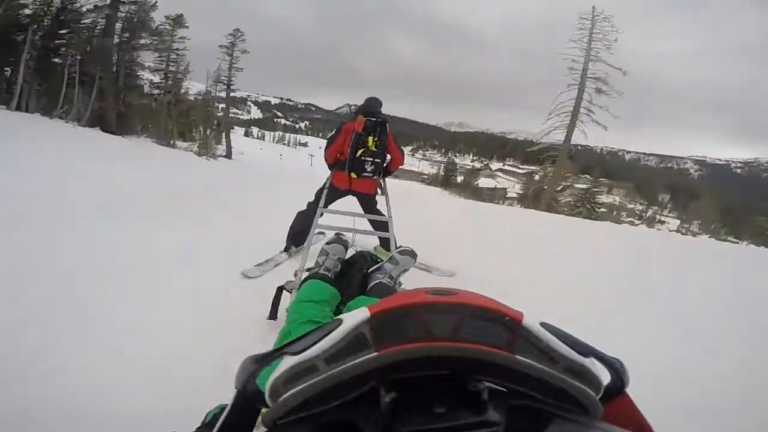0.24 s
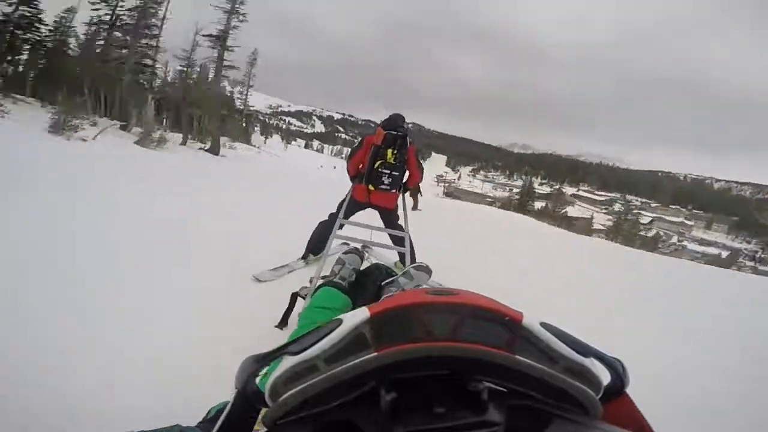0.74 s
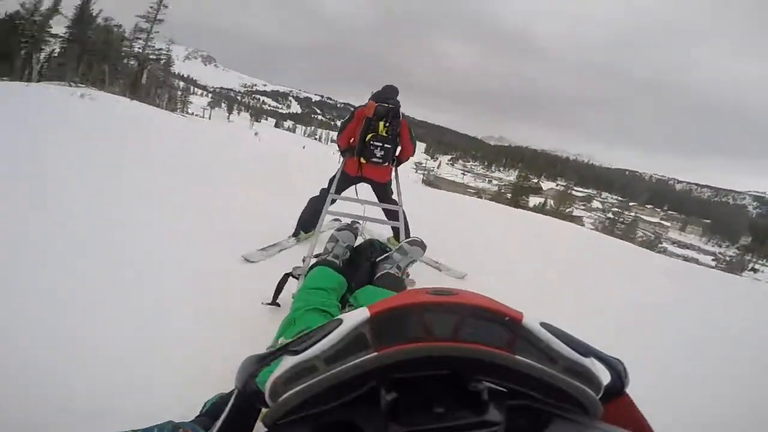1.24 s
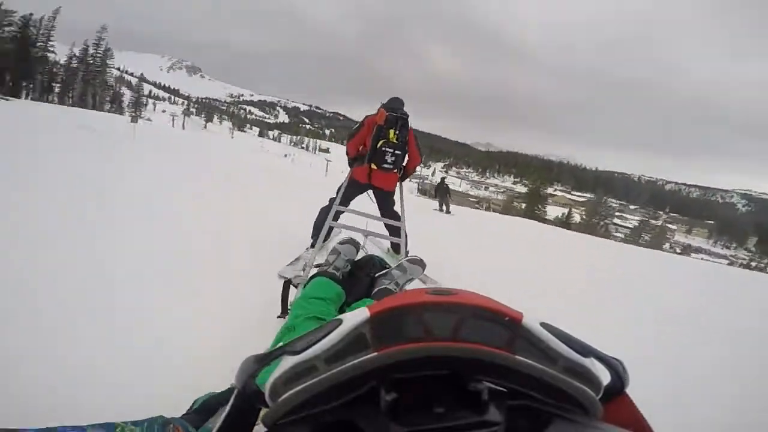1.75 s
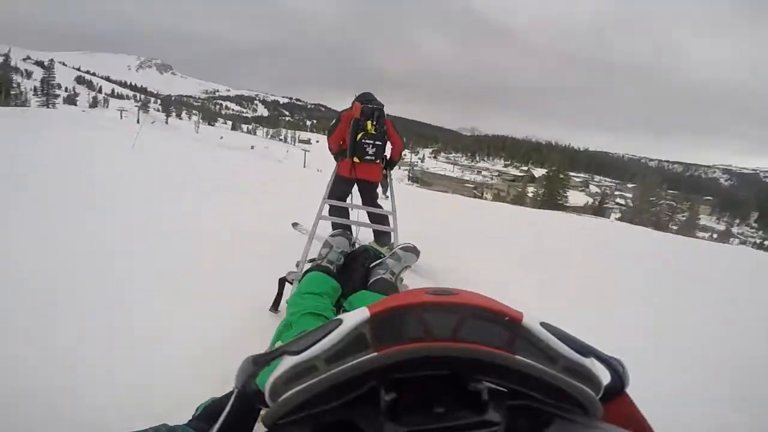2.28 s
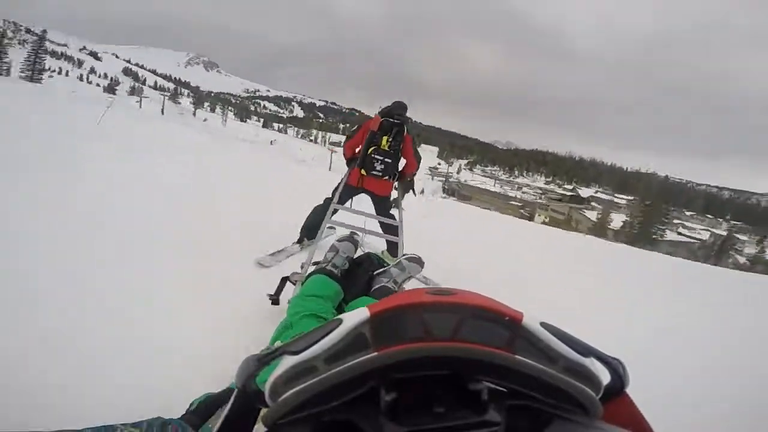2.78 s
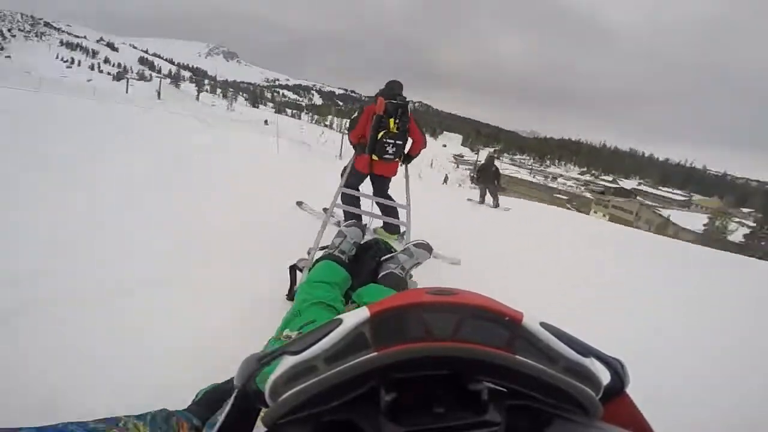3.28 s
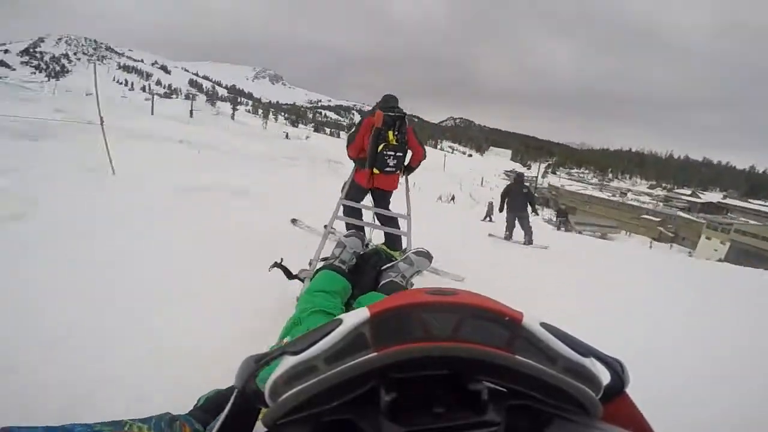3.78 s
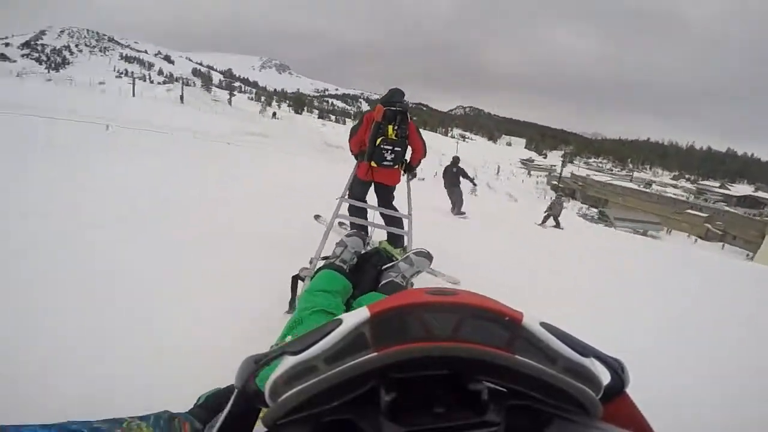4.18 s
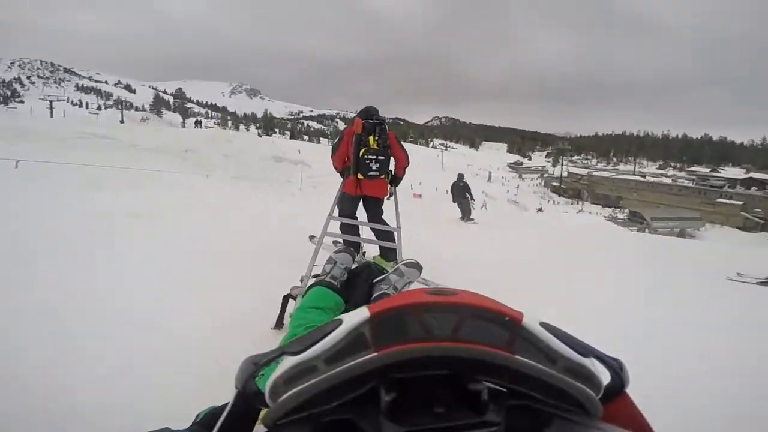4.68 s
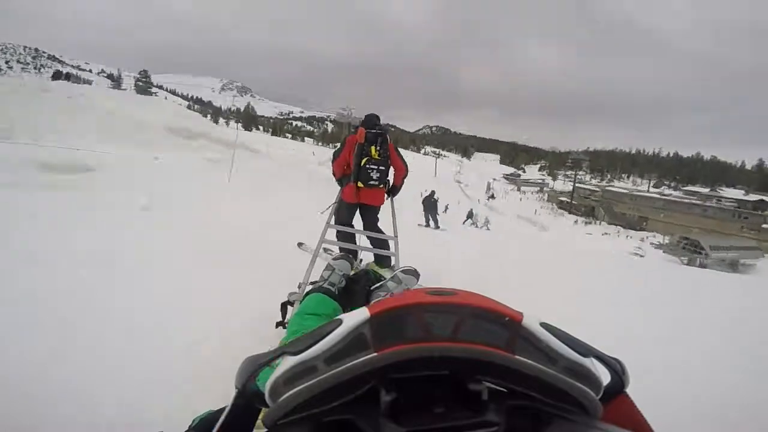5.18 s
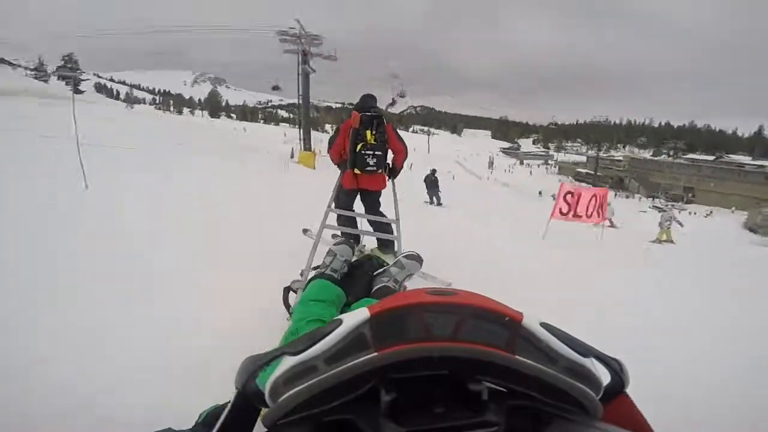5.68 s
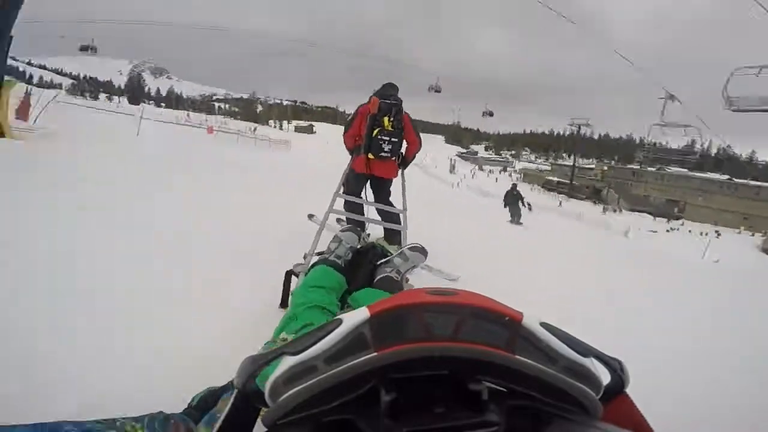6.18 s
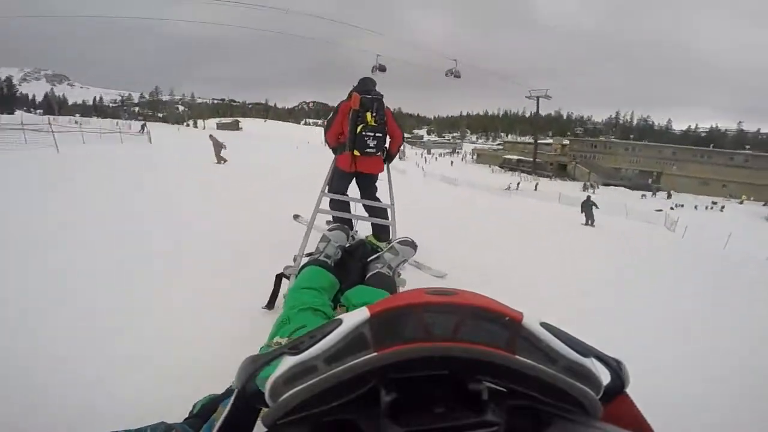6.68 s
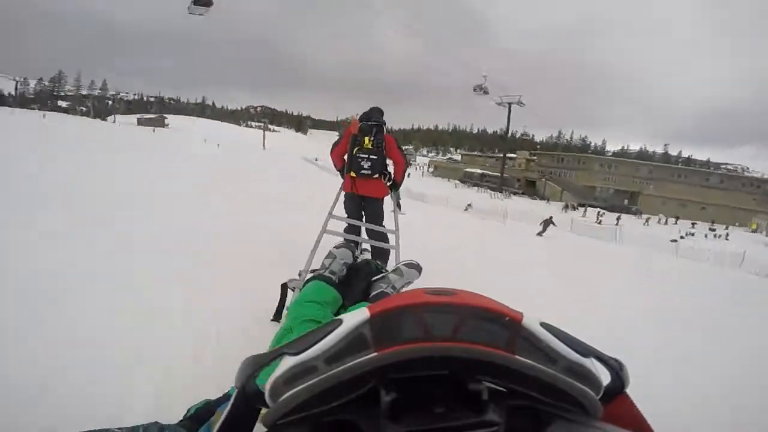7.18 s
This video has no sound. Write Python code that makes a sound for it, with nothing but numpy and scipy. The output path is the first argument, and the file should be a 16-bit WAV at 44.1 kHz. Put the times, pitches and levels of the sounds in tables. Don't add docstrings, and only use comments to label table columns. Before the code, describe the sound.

Hollow hull thumps, gritty snow scraping and crackling crystals from a sled sliding downhill, with one piercing ice crack and rougher bumps late on.

```python
import sys
import numpy as np
from scipy import signal
from scipy.fft import rfft, irfft, next_fast_len
from scipy.io import wavfile
from scipy.ndimage import uniform_filter1d

SR = 44100
rng = np.random.default_rng(int(sys.argv[2]) if len(sys.argv) > 2 else 0)


def voltage_ratio(decibels):
    exponent = np.asarray(decibels, float) / 20
    return 10 ** exponent


def to_wav(sig):
    pcm = np.clip(np.atleast_2d(sig), -1, 1) * 32767
    pcm = np.round(pcm).astype(np.int16)
    wavfile.write(sys.argv[1], SR, pcm.T)


N = 328545

# [f/Hz, width/Hz, level/dB]
HULL_NOTES = [(198.7, 124, -9), (272, 45.4, 0.5), (364, 69, -8)]
# [t/s, peak level/dB, f/Hz]
SLAPS = [(0.115, -12, 260), (0.272, -7, 256), (0.666, -8.5, 270), (0.708, -9, 250), (0.785, -12.5, 288),
         (0.886, -11, 283), (1.162, -10, 266), (1.257, -4.5, 265), (1.413, -5.5, 279), (1.592, -16, 269),
         (2.403, -10, 269), (3.171, -7.5, 256), (3.283, -12.5, 293), (4.051, -11, 264), (5.273, -12, 264),
         (5.381, -3.5, 272), (5.41, -16, 264), (5.659, -7.5, 277), (5.704, -22, 291), (5.882, -6.5, 246),
         (5.963, -5, 261), (6.063, -5.5, 242), (6.108, -10, 318), (6.16, -8, 290), (6.851, -12, 288),
         (6.939, -10.5, 320), (7.011, -15, 280), (7.119, -8.5, 288), (7.165, -7, 335), (7.268, -1, 266)]


def hull(level_db, chatter):
    shake = rng.standard_normal(N) * voltage_ratio(0.42 * chatter + 2.4 * drift(29.0))
    notes = np.zeros(N)
    for k, (hz, width_hz, db) in enumerate(HULL_NOTES):
        sign = (-1) ** k
        notes += sign * voltage_ratio(db) * resonance(shake, hz, width_hz)
    drumming = signal.sosfilt(signal.butter(4, 450, fs=SR, output="sos"), notes)
    out = voltage_ratio(level_db + 0.5) * evened(drumming, span_s=0.06, share=0.75)
    t = np.arange(int(0.022 * SR)) / SR
    rise_s, fade_s = 0.0013, 0.0098
    swell_and_fade = (1 - np.exp(-t / rise_s)) * np.exp(-t / fade_s)
    for s, peak_db, hz in SLAPS:
        slap = swell_and_fade * np.sin(2 * np.pi * hz * t)
        at = round(s * SR)
        out[at:at + len(t)] += voltage_ratio(peak_db + 1) * slap[:N - at]
    return out


# [f/Hz, level/dB per Hz]
BUZZ_TONE = [(250, -19), (430, 1.5), (520, 0), (700, -3), (940, -9.5), (1150, -9), (1600, -29), (2600, -27)]


def buzz(hull_db, spray_db, chatter):
    shake = rng.standard_normal(N) * voltage_ratio(2.0 * chatter + 0.75 * drift(36.0))
    level_db = 0.56 * hull_db + 0.55 * spray_db - 6.0
    return voltage_ratio(level_db) * evened(colour(shake, BUZZ_TONE), span_s=0.17, share=1.0)


# [f/Hz, level/dB per Hz]
SCRAPE_TONE = [(300, -22), (600, -4.5), (1100, 1), (1500, 0), (2150, -3), (2500, -8.5), (3350, -9.5),
               (3600, -16.5), (5000, -18.5), (7000, -34)]


def scrape(level_db, chatter):
    rush = rng.standard_normal(N) * voltage_ratio(0.56 * chatter + 1.83 * drift(64.0))
    crunches_per_s = 1200 * voltage_ratio(1.5 * chatter + 2.5 * drift(35.0))
    crunch = rms_one(grains(crunches_per_s, spread_db=4.0))
    shaved = colour(rush + voltage_ratio(-4) * crunch, SCRAPE_TONE)
    return voltage_ratio(level_db + 1.0) * evened(shaved, span_s=0.073, share=0.8)


# [f/Hz, level/dB per Hz]
GLIDE_TONE = [(1500, -13), (2500, -2), (3350, -3.5), (3650, -9), (5150, -4.5), (5450, -2), (6600, 7.5),
              (7700, 0), (9000, 6.5), (11000, -3), (13000, 4), (16000, 0.5)]


def glide(scrape_db, chatter):
    swell_db = 0.32 * (scrape_db - scrape_db.mean()) + 0.4 * chatter + 1.63 * drift(25.0)
    return voltage_ratio(-42 + swell_db) * rms_one(colour(rng.standard_normal(N), GLIDE_TONE))


# [f/Hz, level/dB per Hz]
SPRAY_TONE = [(2500, -41), (3700, -18.5), (5150, -17), (5450, -8.5), (6600, -11), (7700, -12), (9500, -1.5),
              (11000, 4), (12500, -3.5), (14000, -7.5), (16000, -5)]


def spray(level_db, chatter):
    clump_db = 0.62 * chatter + 4.2 * drift(83.0)
    hiss = rng.standard_normal(N) * voltage_ratio(clump_db)
    ticks = rms_one(grains(6000 * voltage_ratio(0.59 * clump_db), spread_db=5.5))
    crackle = colour(hiss + voltage_ratio(1.5) * ticks, SPRAY_TONE)
    return voltage_ratio(level_db + 1.65) * evened(crackle, span_s=0.073, share=0.91)


def grit(spray_db):
    ticks = np.abs(grains(45, spread_db=3.0))
    fade_s = 0.00097
    bursts = signal.lfilter([1], [1, -np.exp(-1 / (fade_s * SR))], ticks) * rng.standard_normal(N)
    return voltage_ratio(spray_db - 9.5) * rms_one(colour(bursts, SPRAY_TONE))


# [t/s, peak level/dB, dull tap level/dB re peak, middle ring level/dB re peak, shatter/ms]
CHIPS = [
    (1.1313, -13, -27, -24, .8),
    (2.3885, -12, -28, -28, .6),
    (2.6488, -26, -3, 2, .6),
    (5.4722, -24, -20, 8, .6),
    (5.4832, 3.5, -24, -29, .2),
    (6.560, -15, -26, -24, .54),
]
# [t/s, peak level/dB]
PELLETS = [(0.2733, -12), (0.3726, -18), (0.7682, -18), (0.8854, -15.5), (1.1523, -22), (1.262, -17),
           (1.3887, -16.5), (1.4521, -21), (1.5653, -32), (2.2952, -22), (2.5007, -21), (2.5441, -19),
           (2.9392, -19), (3.2655, -46), (4.124, -24), (5.4311, -9.5), (5.6884, -18), (5.7159, -15),
           (5.7528, -17), (5.8755, -11), (5.9155, -12), (5.9928, -12), (6.755, -14), (6.8633, -24),
           (6.9815, -14), (7.017, -10), (7.0599, -13), (7.1666, -9.5), (7.237, -15), (7.4275, -15)]


def pellets():
    bits = CHIPS + [(s, db, -25, -24, 2.8) for s, db in PELLETS]
    t = np.arange(int(0.008 * SR)) / SR
    shatter_s = np.clip(np.array(bits)[:, 4:], 0.2, 3) / 1000
    signs = rng.choice([-1, 1], (len(bits), len(t)))
    cracks = signs * (1 - np.exp(-t / 0.0001)) * np.exp(-t / shatter_s)
    tap_band = signal.butter(2, [1400, 6300], "band", fs=SR, output="sos")
    ring_band = signal.butter(2, [5800, 9000], "band", fs=SR, output="sos")
    taps = signal.sosfilt(tap_band, cracks)
    rings = signal.sosfilt(ring_band, cracks)
    brights = resonance(cracks, 11140, 1400) + voltage_ratio(-17) * resonance(cracks, 14000, 2500)
    out = np.zeros(N + len(t))
    for (s, peak_db, dull_db, middle_db, _), *parts in zip(bits, brights, taps, rings):
        bright, tap, ring = [part / np.abs(part).max() for part in parts]
        hit = bright + voltage_ratio(dull_db + 8) * tap + voltage_ratio(middle_db + 2.5) * ring
        at = round(s * SR)
        out[at:at + len(t)] += voltage_ratio(peak_db - 1.5) * hit
    return out[:N]


# [t/s, peak level/dB]
KNOCKS = [
    (0.806, -27),
    (1.568, -24),
    (5.764, -17),
    (6.864, -22),
    (6.939, -31),
    (7.016, -22),
    (7.188, -24),
    (7.259, -28),
]


def handles(hull_db):
    ringing = rms_one(resonance(rng.standard_normal(N), 942, 31))
    hum = ringing * voltage_ratio(hull_db - 29.5 + 2.0 * drift(8.0))
    s, db = np.transpose(KNOCKS)
    width_hz = 500
    clicks = np.zeros(N) + 1e-18
    clicks[(s * SR).astype(int)] = voltage_ratio(db + 2) * SR / (2 * np.pi * width_hz)
    dulled = signal.lfilter([0.2], [1, -0.8], clicks)
    return hum + resonance(dulled, 800, width_hz)


# [f/Hz, level/dB per Hz]
WIND_TONE = [(15, -8), (30, -36), (48, -2.5), (68, 4.5), (110, 2.5), (170, -2), (260, -29), (500, -45.5)]
# [t/s, level/dB]
GUSTS = [(0.0, -27), (0.14, -25), (1.6, -24.5), (1.64, -16.5), (1.8, -28.5), (1.87, -22.5), (2.12, -30.5),
         (2.18, -25), (4.23, -26.5), (4.85, -27.5), (4.9, -23), (5.95, -27), (7.14, -26), (7.18, -20),
         (7.24, -31), (7.3, -20), (7.41, -24), (7.45, -19)]


def wind():
    level_db = in_time(GUSTS)[0]
    return voltage_ratio(level_db) * evened(colour(rng.standard_normal(N), WIND_TONE), span_s=0.081, share=0.41)


def rms_one(x):
    return x / np.sqrt(np.mean(x ** 2) + 1e-20)


def in_time(rows):
    s, *columns = np.transpose(rows)
    return [np.interp(np.arange(N) / SR, s, c) for c in columns]


def swells(rows):
    s, length_s, *columns = np.transpose(rows)
    t = np.arange(0, N + 64, 64) / SR
    bells = np.exp(-2 * ((t[:, None] - s) / length_s) ** 2)
    return [np.interp(np.arange(N) / SR, t, bells @ c) for c in columns]


def drift(rate_hz):
    r = np.exp(-2 * np.pi * rate_hz / SR)
    wander = signal.lfilter([1], [1, -2 * r, r * r], rng.standard_normal(N + SR))
    return rms_one(wander[SR:])


def grains(per_s, spread_db):
    sizes = voltage_ratio(spread_db * np.minimum(rng.exponential(1, N), 5)) * rng.choice([-1, 1], N)
    return sizes * (rng.random(N) < per_s / SR)


def evened(x, span_s, share):
    power = uniform_filter1d(x ** 2, int(span_s * SR)) + 1e-12
    return rms_one(x / power ** (np.clip(share, 0, 1) / 2))


def colour(x, points):
    size = 2 * next_fast_len(N // 2 + 4096)
    hz, level_db = np.transpose(points)
    log_hz = np.log(np.fft.rfftfreq(size, 1 / SR) + 1)
    log_gain = np.log(voltage_ratio(np.interp(log_hz, np.log(hz), level_db)))
    cepstrum = irfft(log_gain, size)
    cepstrum[1:size // 2] *= 2
    cepstrum[size // 2 + 1:] = 0
    return irfft(rfft(x, size) * np.exp(rfft(cepstrum)), size)[:N]


def resonance(x, hz, width_hz):
    r = np.exp(-np.pi * width_hz / SR)
    feedback = [1, -2 * r * np.cos(2 * np.pi * hz / SR), r * r]
    return signal.lfilter(np.array([1, 0, -1]) * (1 - r * r) / 2, feedback, x)


# [t/s, level/dB]
CRUST = [(0.0, -39.3), (0.82, -33), (0.94, -38), (1.51, -34), (1.98, -46.5), (2.5, -37), (2.62, -41.5),
         (3.24, -39), (3.36, -35.9), (3.93, -46), (4.75, -38), (5.17, -42.5), (5.44, -26.6), (5.61, -32),
         (5.88, -28.5), (6.55, -41.5), (7.23, -29), (7.45, -39.3)]
# [t/s, level/dB]
CARVING = [(0.0, -42.5), (0.19, -42), (0.29, -42), (1.86, -43.5), (2.32, -44), (2.42, -40.7), (2.64, -44.5),
           (3.37, -40.5), (3.59, -44.9), (4.53, -40.2), (4.6, -39), (5.21, -44), (5.43, -35), (5.59, -41.5),
           (5.75, -37.5), (6.24, -43), (7.36, -43), (7.45, -42.5)]
# [t/s, length/s, extra spray level/dB, extra drumming level/dB]
RIDGES = [(0.279, 0.031, 3.5, 1.5), (1.147, 0.054, 3, 0.4), (1.267, 0.014, 5.5, 1), (1.427, 0.031, 2, 1.5),
          (1.457, 0.024, 5.5, 6), (1.556, 0.049, 6.5, 3), (1.596, 0.036, 1.5, 6.5), (1.736, 0.036, 6, 2.4),
          (1.866, 0.027, 8.5, -1.5), (2.395, 0.015, 6, -4), (2.554, 0.043, 4.5, 5), (2.993, 0.043, 7.1, 4),
          (3.572, 0.029, -1, 5.0), (3.971, 0.037, 3, 2.5), (4.141, 0.033, 4.8, 5), (4.5, 0.028, 4.6, -1.2),
          (4.649, 0.027, 2, 5.5), (4.919, 0.015, 4.3, 0), (5.059, 0.12, -0.3, 3), (5.488, 0.062, 5, 3.2),
          (5.667, 0.047, 4, -3), (5.757, 0.032, 5.5, 7), (5.996, 0.017, 2, 4), (6.176, 0.068, 4, 2),
          (6.565, 0.065, 4, -1.5), (6.755, 0.015, 4, 2), (7.024, 0.042, -2, 5.6), (7.263, 0.059, 2, 5.5),
          (7.353, 0.031, 2.5, 4.5), (7.443, 0.043, 11.1, 6.5)]
# [t/s, length/s, dip level/dB]
HOPS = [(.18, 0.094, 3.5), (.459, 0.026, 3), (.629, 0.12, 4.5), (.988, 0.039, 4), (1.07, .03, 2),
        (1.297, 0.012, 6.5), (1.337, 0.083, 2), (1.49, 0.016, 3), (1.625, 0.014, 4), (1.66, 0.018, 2),
        (2.02, 0.046, 2.5), (2.205, .075, 3.5), (2.464, 0.033, 8), (2.594, 0.029, 5), (2.76, .03, 0.5),
        (2.88, 0.027, -0.5), (3.05, 0.026, 2.5), (4.02, 0.062, 2.5), (4.33, 0.025, 5), (4.42, .08, 2.5),
        (5.02, 0.032, 1.5), (5.15, .04, 1), (5.62, 0.029, 5), (6.266, .032, 4.5), (6.366, 0.016, 2.5),
        (6.435, .036, 3), (6.894, 0.018, 6.5), (7.094, 0.02, 1.5), (7.305, .025, 4.5), (7.39, .03, 2)]
# [t/s, length/s, extra scrape level/dB]
BITES = [(.08, .04, 2), (.8, .1, 2), (1.6, .05, 3.5), (3.12, .1, 2.5), (4.2, .12, 1.5), (4.72, 0.088, 2.5),
         (4.86, 0.035, 1), (5.06, 0.072, 3), (6.1, .12, 1.5), (6.33, .05, 3), (6.68, .12, 1.5),
         (6.86, 0.066, 2), (7.2, 0.046, 3.5), (7.27, .04, 2), (7.448, 0.017, 5.5)]


def scene():
    crust_db, edges_db = in_time(CRUST) + in_time(CARVING)
    thrown_db, struck_db, light_db = swells(RIDGES) + swells(HOPS)
    bite_db = swells(BITES)[0]
    spray_db = crust_db + thrown_db - light_db
    scrape_db = edges_db + bite_db + 0.2 * thrown_db - 0.66 * light_db
    crust_swing_db = crust_db - crust_db.mean()
    edges_swing_db = edges_db - edges_db.mean()
    hull_db = -22 + 0.42 * crust_swing_db + struck_db + 0.046 * edges_swing_db - 0.93 * light_db
    chatter = drift(21.0)
    shell = hull(hull_db, chatter) + buzz(hull_db, spray_db, chatter)
    runners = scrape(scrape_db, chatter) + glide(scrape_db, chatter)
    crystals = spray(spray_db, chatter) + grit(spray_db) + pellets()
    return (shell + runners + crystals + handles(hull_db) + wind())[None]


def band_limit(x):
    return signal.sosfilt(signal.butter(12, 16270, fs=SR, output="sos"), x)


def record(dry):
    rounded = 1.4 * np.tanh(dry / 1.4)
    steep_cut = signal.ellip(16, 0.5, 80, 15740, fs=SR, output="sos")
    mix = signal.sosfilt(steep_cut, rounded)
    return band_limit(mix)


dry = scene()
out = record(dry)
to_wav(out)
```